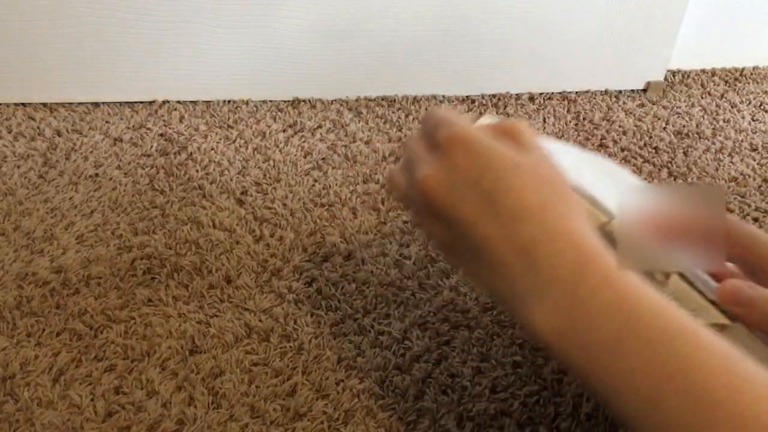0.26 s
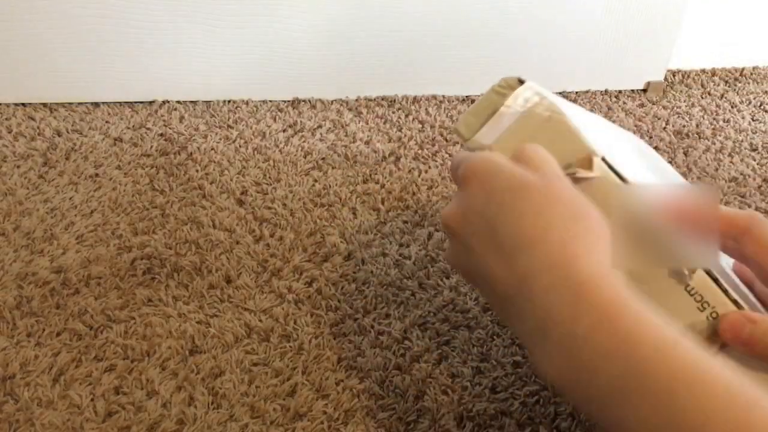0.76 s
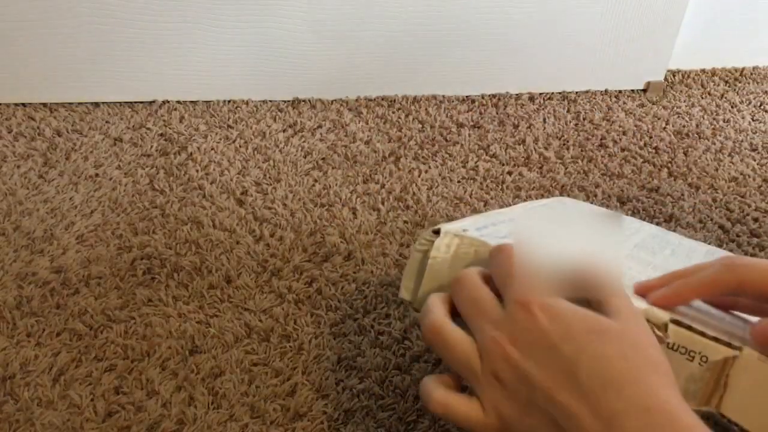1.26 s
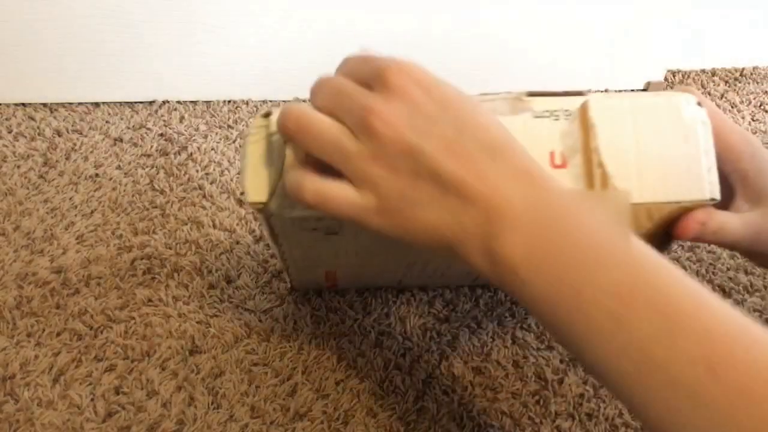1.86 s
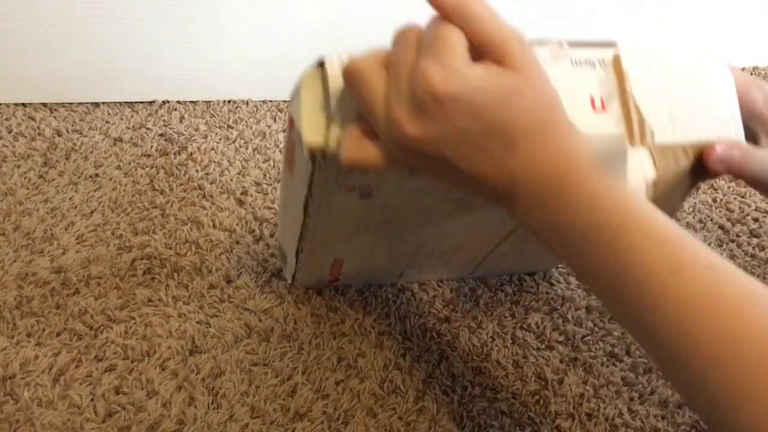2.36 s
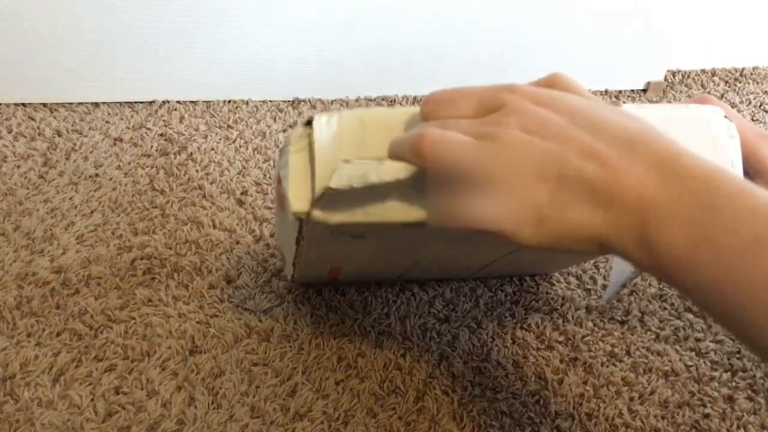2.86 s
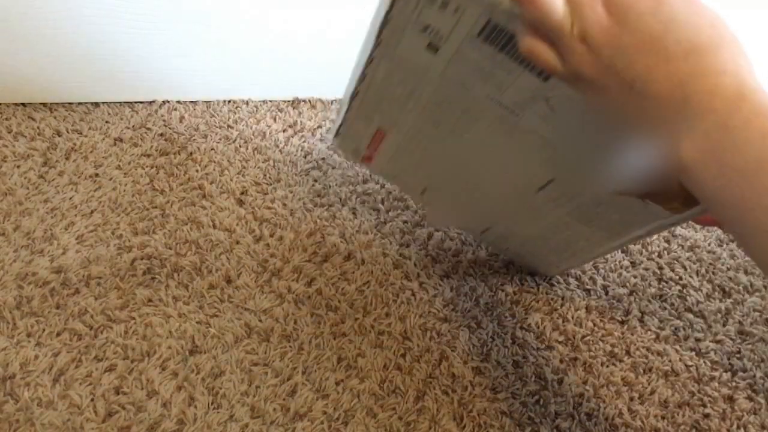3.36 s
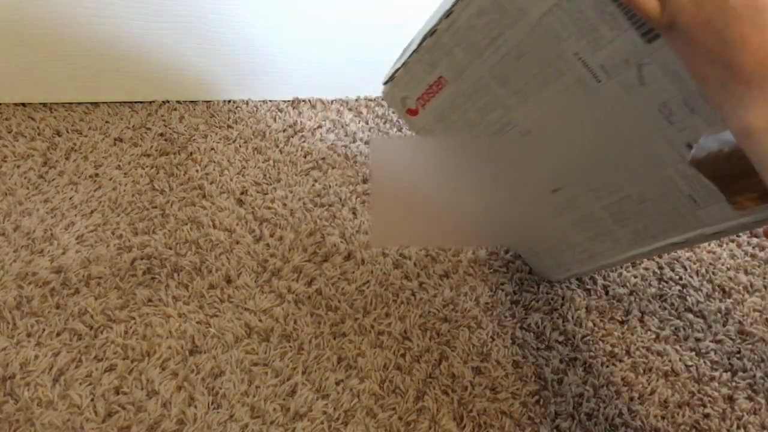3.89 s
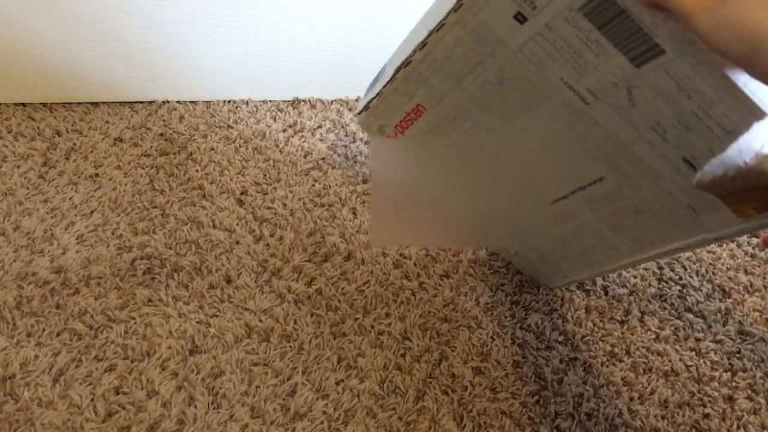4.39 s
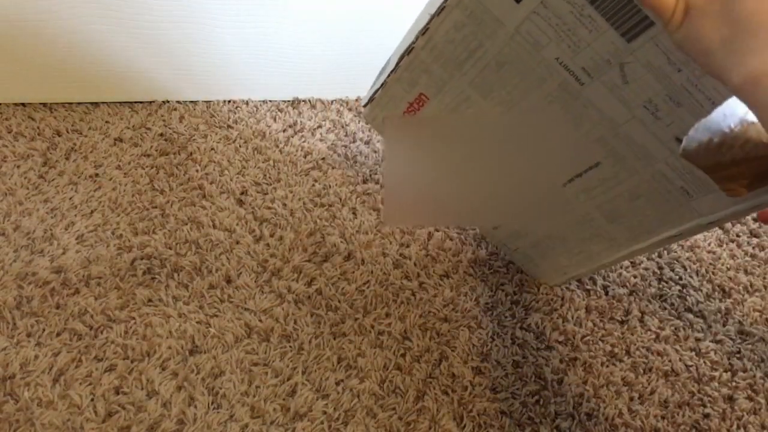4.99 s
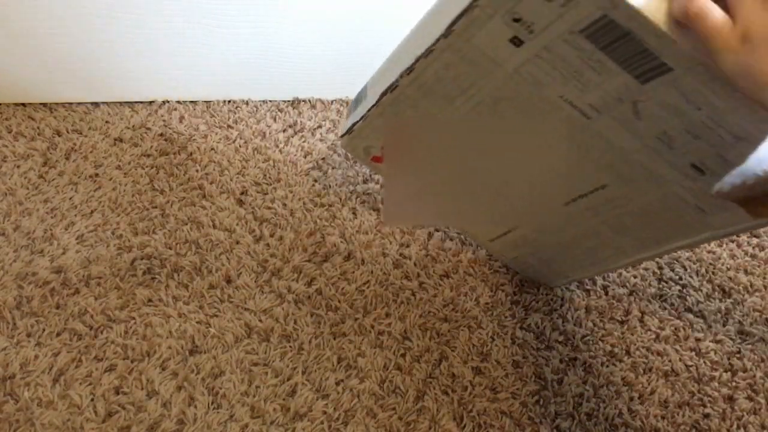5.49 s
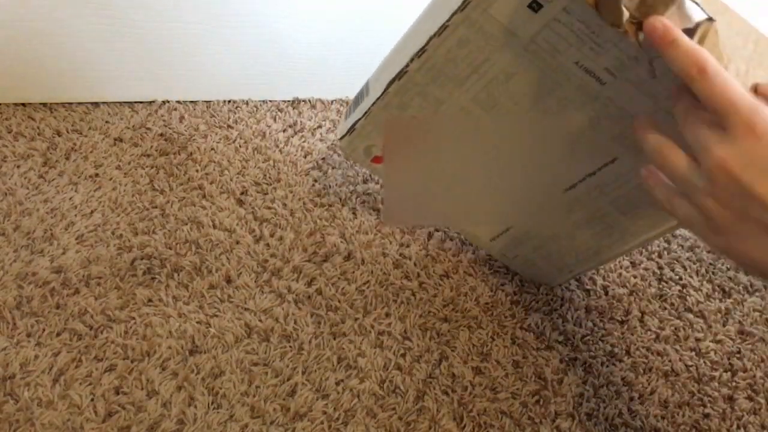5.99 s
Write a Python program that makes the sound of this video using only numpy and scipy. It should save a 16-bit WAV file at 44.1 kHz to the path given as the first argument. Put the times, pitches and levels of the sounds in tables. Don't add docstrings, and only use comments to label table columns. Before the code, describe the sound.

Cardboard rips and buckles in uneven bursts, folds popping sharply and fingers rubbing the board, with one sharp loud crack near the end.

```python
import sys
import numpy as np
from scipy import signal
from scipy.fft import rfft, irfft
from scipy.io import wavfile
from scipy.ndimage import uniform_filter1d

SR = 44100
rng = np.random.default_rng(int(sys.argv[2]) if len(sys.argv) > 2 else 0)


def magnitude_from_level(level_db):
    exponent = np.asarray(level_db, float) / 20
    return 10 ** exponent


def int16_out(signal):
    q = np.round(np.clip(np.atleast_2d(signal).T, -1, 1) * 32767)
    wavfile.write(sys.argv[1], SR, q.astype(np.int16))


N = 275625


def tearing():
    # pitch in Hz, level in dB per Hz.
    fibre_colour = [(2000, -13.5), (3400, 0.5), (4800, -2.5), (6250, -1), (8700, -8.5), (10000, -5),
                    (16000, -11)]
    # pitch in Hz, level in dB per Hz.
    board_colour = [(400, -24), (750, -9.5), (1200, -2.5), (1600, -3), (3500, -15), (6000, -36.5)]
    # pitch in Hz, level in dB per Hz.
    wall_colour = [(70, -29), (250, -7.5), (420, 4), (620, -1), (1300, -56.5)]
    board_gain, fizz_gain, walls_gain = effort()
    breaks = evened(grains(per_s=14000, spread_db=4.0, clump_db=3.0))
    fresh_creases = evened(grains(per_s=6000, spread_db=1.5, clump_db=2.0))
    creases = evened(0.19 * breaks + fresh_creases)
    pushes = grains(per_s=3100, spread_db=2.5, clump_db=4.5)
    fizz = patchy(colour(breaks, fibre_colour), 2.1)
    board = patchy(colour(creases + 0.36 * box(creases), board_colour), 3.94)
    fizz = fizz_gain * patchy(fizz, 1.76, size=512, spans=(2, 8))
    board = board_gain * patchy(board, 1.8, size=512, spans=(2, 8))
    thud = evened(colour(pushes, [(60, -17.5), (120, 5.5), (400, -23.5)]))
    thud = (0.16 * fizz_gain + 0.17 * walls_gain) * thud
    walls = walls_gain * evened(colour(pushes + 0.092 * box(pushes), wall_colour))
    return fizz + board + thud + walls


def effort():
    # time in seconds, pressure in dB.
    resting_grip = [(0.0, -53), (0.17, -63.5), (0.3, -56), (0.7, -64.5), (1.5, -57), (2.05, -60),
                    (2.52, -55.5), (2.75, -64), (3.2, -65), (5.0, -64.5), (5.9, -59.5), (6.25, -59.5)]
    grip_db = [0, -7, -0.5]
    # start in seconds, rise in ms, run in ms, fizz in dB, board in dB.
    runs = [(0.067, 7.1, 78, -53, -46), (0.432, 1.2, 12, -55, -45), (0.492, 4.1, 23, -50.5, -51),
            (0.81, 21, 31, -39, -59), (0.862, 2.1, 41, -39, -68), (0.933, 2.2, 84, -50.5, -47.5),
            (1.053, 14, 11, -46, -34), (1.322, 0.65, 32, -49.5, -43), (1.391, 15, 45, -50.5, -52),
            (1.76, 20, 230, -57, -75), (1.884, 13, 43, -47, -52), (2.217, 47, 8.7, -58.5, -43.5),
            (2.455, 8.3, 26, -37.5, -45), (2.577, 1.1, 15, -59, -32), (2.958, 9.6, 24, -47.5, -48.5),
            (3.444, 1.6, 31, -72, -49), (4.156, 2, 34, -51, -41), (4.27, 2.5, 8.2, -45.5, -45),
            (4.428, 4.5, 93, -46.5, -70), (5.2, 10, 190, -68, -43), (5.316, 40, 73, -47, -49),
            (5.484, 25, 31, -55, -54), (5.604, 9.4, 19, -64, -44.5), (6.157, 5.4, 28, -46, -65)]
    # start in seconds, rise in ms, fall in ms, fizz in dB, board in dB.
    pulls = [(0.182, 140, 46, -48, -49), (0.353, 36, 17, -49.5, -61), (0.517, 19.3, 29, -47.5, -46.5),
             (0.762, 21, 47, -39.5, -41), (1.108, 54, 440, -48, -76), (1.683, 14.5, 47, -49.5, -53),
             (2.061, 18, 81, -46.5, -38.5), (2.39, 29.6, 19, -59, -30), (2.634, 33, 77, -44.5, -41.5),
             (2.79, 60, 33, -54, -38), (3.5, 33, 21, -48, -65), (3.566, 23, 120, -45.5, -60),
             (3.703, 26, 23, -51, -67), (3.854, 47, 95, -47.5, -65), (3.996, 24.5, 69, -32, -34),
             (4.567, 16.5, 47, -43.5, -53), (4.668, 31, 40, -37, -38.5), (4.846, 23, 37, -44, -63),
             (5.825, 14, 170, -49.5, -53), (5.95, 62, 30, -43.5, -48.5), (6.083, 45, 25, -45, -45.5)]
    # start in seconds, fall in ms, fizz in dB, board in dB.
    seams = [(1.531, 160, -43, -44.5), (1.959, 46, -64, -36), (2.387, 145, -28, -31.5),
             (3.089, 170, -47.5, -45.5), (4.532, 41, -44, -56), (4.909, 37, -61, -54),
             (5.096, 140, -46.5, -68), (5.436, 36, -48.5, -44), (5.554, 43, -33, -45),
             (5.693, 39, -28, -33), (6.211, 20, -46, -46)]
    # start in seconds, rise in ms, fall in ms, fizz in dB, board in dB.
    strokes = [(0.177, 24, 100, -53.5, -50.5), (0.74, 52, 1100, -58, -53), (1.03, 120, 60, -58, -46.5),
               (1.299, 22, 78, -95, -46.5), (1.3, 220, 110, -48.5, -54), (2.16, 180, 78, -56.5, -54),
               (2.559, 73, 66, -48.5, -44), (2.729, 110, 66, -51, -45), (2.88, 148, 110, -53, -51),
               (3.2, 182, 70, -54.5, -55), (3.5, 90, 20, -49, -46), (3.55, 99, 720, -57, -52.5),
               (4.13, 196, 300, -51.5, -49.5), (4.637, 57, 240, -49, -49), (4.72, 120, 280, -67, -52),
               (5.1, 220, 55, -58, -48), (5.46, 124, 210, -57.5, -52), (5.66, 87, 57, -58, -46.5),
               (6.06, 134, 32, -58, -54.5)]
    # start in seconds, length in ms, level in dB.
    jolts = [(0.065, 190, -53), (0.181, 51, -43), (0.595, 75, -53), (0.691, 83, -51), (1.12, 155, -42.5),
             (2.385, 29, -33.5), (2.64, 82, -48), (2.79, 180, -42), (2.925, 62, -47.5), (3.55, 105, -48),
             (3.651, 30, -40.5), (3.994, 99, -40.5), (4.66, 136, -48), (5.69, 67, -33.5), (5.896, 45, -45)]
    stroke_sag_db = -13.5

    s, pressure_db = np.transpose(resting_grip)
    pressure_db = np.interp(np.arange(N) / SR, s, pressure_db)
    power = magnitude_from_level(2 * (pressure_db + np.array(grip_db)[:, None]))
    board_power, fizz_power, walls_power = power
    releases = [(start, 1.86, *rest) for start, *rest in seams]
    kinds = ((runs, -10), (pulls, -31.5), (releases, -37), (strokes, stroke_sag_db))
    for rows, sag_db in kinds:
        for start, rise_ms, fall_ms, fizz_db, board_db in rows:
            shape = swell(rise_ms, fall_ms, sag_db)
            add(board_power, start, magnitude_from_level(2 * board_db) * shape)
            add(fizz_power, start, magnitude_from_level(2 * fizz_db) * shape)
    for start, rise_ms, fall_ms, _, board_db in strokes:
        add(walls_power, start, magnitude_from_level(2 * (board_db - 15)) * swell(rise_ms, fall_ms, stroke_sag_db))
    rise_share = 0.32
    for start, ms, db in jolts:
        shape = swell(rise_share * ms, (1 - rise_share) * ms, sag_db=-41)
        add(walls_power, start, magnitude_from_level(2 * db) * shape)
    return np.sqrt(power)


def swell(rise_ms, fall_ms, sag_db, rise_db=13.5):
    corners = np.cumsum([0, rise_ms, fall_ms, 6.0]) * SR / 1000
    level_db = np.interp(np.arange(corners[-1]), corners, [-rise_db, 0, sag_db, sag_db - 2])
    return magnitude_from_level(2 * level_db)


def grains(per_s, spread_db, clump_db):
    happens = rng.random(N) < per_s / SR
    size = np.minimum(rng.exponential(1, N), 2)
    push = rng.standard_normal(N)
    clump = uniform_filter1d(rng.standard_normal(N), size=130)
    clump = evened(uniform_filter1d(clump, size=130))
    return happens * push * magnitude_from_level(spread_db * size + clump_db * np.clip(clump, -2, 1))


def patchy(x, depth_db, size=256, spans=(7, 8)):
    z = signal.stft(x, nperseg=size)[2]
    patches = rng.standard_normal(z.shape[::-1]).T
    patches = uniform_filter1d(patches, size=spans[0], axis=0)
    patches = evened(uniform_filter1d(patches, size=spans[1], axis=1))
    return evened(signal.istft(z * magnitude_from_level(depth_db * patches), nperseg=size)[1][:N])


def snaps():
    t = np.arange(900) / SR
    knocks, cracks = np.zeros((2, N))
    for s, knock_db, hz, crack_db, ms, sharp in folds():
        over, late = rng.random(2)
        noise = rng.standard_normal(len(t))
        cycles = t * hz
        u = t / (0.00029 * ms)
        phase = 2 * np.pi * (0.86 * cycles + 0.43 * (1 - np.exp(-cycles)) + late)
        knock = (u * np.exp(1 - u)) ** 2 * np.sin(phase)
        extra_hz = 0.59 * hz * over + 1100
        edge_cycles = cycles + extra_hz * 0.00217 * (1 - np.exp(-t / 0.0021))
        edge_fade = np.exp(-t / 0.0017) * np.minimum(t / 0.00042, 1)
        edge = np.sin(2 * np.pi * edge_cycles) * edge_fade
        add(knocks, s, magnitude_from_level(knock_db) * (knock + sharp * edge + 0.026 * ring(t, hz, 0.041)))
        crack_fade = np.minimum(u, 1) * magnitude_from_level(-60 * t / (0.0026 + 0.0028 * ms))
        add(cracks, s, magnitude_from_level(crack_db + 2.5) * noise * crack_fade)
    bright = signal.sosfilt(signal.butter(4, 4300, "high", fs=SR, output="sos"), cracks)
    bright = colour(bright, [(5700, -1.5), (7300, -1.0), (9500, -4.0), (16000, -6.5)])
    return knocks + magnitude_from_level(-8.5) * box(knocks) + bright


def folds():
    # time in seconds, knock peak in dB,
    # knock pitch in Hz, crack peak in dB, knock length in ms.
    bursts = [(0.076, -40, 637, -34, 6.3), (0.7699, -28, 1860, -31, 10), (0.7813, -30, 1140, -41, 5.4),
              (1.064, -34, 2450, -48, 4.5), (1.6172, -11, 1780, -34, 2.16), (2.3734, -29, 2100, -22.5, 2.3),
              (2.3889, -18, 2960, -12.5, 4.6), (2.4018, -27, 1950, -13, 16),
              (2.4079, -18, 1710, -14.5, 2.1), (2.5773, -13.5, 1136, -32.5, 2.15),
              (2.8433, -21, 2860, -33, 2.6), (3.5142, -22.5, 1480, -35, 2.4),
              (3.8969, -18.5, 1430, -25, 2.6), (4.0033, -27, 580, -25, 1.14), (4.0186, -18, 1840, -40, 2.2),
              (4.021, -12, 1600, -36, 0.88), (5.0238, -23.5, 3140, -25, 0.61),
              (5.0988, -21.5, 2250, -28, 1.7), (5.5513, -24.5, 710, -23, 0.83),
              (5.561, -51, 3650, -20, 1.6), (5.6967, -5, 1700, -12.5, 1.93),
              (5.7002, -4.5, 1430, -16, 3.36), (5.8587, -21.5, 3240, -35, 0.67),
              (6.1137, -23.5, 4000, -28, 1.5)]
    # time in seconds, peak in dB, pitch in Hz, sharp edge in dB.
    thumps = [(0.2917, -27.5, 1390, -20), (0.431, -35.5, 1240, -4), (1.3213, -29, 800, -6),
              (1.6526, -27.5, 1130, -43), (1.6625, -31, 1160, -26), (1.666, -30.5, 1190, -30),
              (1.6709, -33, 1200, -25), (1.68, -36, 1190, -25), (1.718, -33, 1300, -17),
              (1.754, -40.5, 446, 1), (2.125, -31, 1220, -10), (2.7364, -30.5, 1430, -16),
              (3.0081, -27, 1430, -13), (3.26, -33.5, 690, 1.5), (3.2982, -32, 874, -2),
              (3.3467, -33, 1020, -2), (3.364, -31, 915, 1), (3.385, -33, 825, 3), (3.4047, -34, 724, 0),
              (3.445, -33, 820, 0), (3.452, -38, 620, 4), (3.468, -38.5, 760, -5), (3.5644, -37, 696, 2),
              (4.011, -27, 1010, -2), (4.3164, -31, 1550, -4), (5.437, -35.5, 1220, 0.5),
              (5.4429, -32, 1230, -4), (5.9126, -44, 580, 3), (6.19, -36.5, 587, -4)]
    # time in seconds, peak in dB, pitch in Hz.
    ticks = [(0.8237, -27, 3140), (0.8633, -35, 3640), (1.1956, -21, 1880), (1.2129, -21.5, 1930),
             (1.2353, -24.5, 2000), (1.247, -19, 2040), (1.2585, -20.5, 2160), (2.3456, -29.5, 1900),
             (2.734, -23, 2230), (2.811, -29, 2770), (2.823, -24, 2320), (2.8288, -25, 2700),
             (3.0906, -25, 2780), (3.1044, -27.5, 3380), (3.535, -30, 3700), (4.16, -25, 2620),
             (4.3962, -39, 3040), (4.4026, -25, 2930), (5.3863, -24.5, 2830), (5.5002, -29, 2470),
             (6.052, -36, 1730), (6.212, -32, 2590)]
    # time in seconds, knock peak in dB, knock pitch in Hz, crack peak in dB.
    bits = [(0.186, -41, 1560, -31.5), (0.8, -34, 1800, -31), (0.8918, -40, 3600, -29),
            (0.9313, -35.5, 1340, -32), (1.9587, -26.5, 1350, -28.5), (1.9644, -31.5, 1100, -34),
            (2.5818, -48, 980, -31), (2.667, -28.5, 980, -39), (2.686, -34, 2170, -37),
            (2.847, -47, 1760, -28.5), (2.971, -36, 4050, -23.5), (2.983, -35, 3180, -24.5),
            (3.1206, -46, 2970, -36), (3.7577, -32.5, 1250, -33.5), (3.8758, -35, 2730, -34),
            (3.9974, -27, 2880, -25.5), (4.271, -41, 1540, -30), (4.389, -44, 2340, -27),
            (4.687, -26.5, 2760, -32), (4.695, -49, 2150, -43), (4.741, -45, 1560, -29),
            (4.809, -37, 2800, -35), (4.879, -38, 770, -30), (5.0637, -29.5, 2410, -30.5),
            (5.1146, -32.5, 2500, -29.5), (5.5494, -25.5, 1200, -23)]
    rows = [(s, db, hz, db - 21, 2.4, magnitude_from_level(edge_db)) for s, db, hz, edge_db in thumps]
    others = [tuple(row) for row in bursts]
    others += [(s, db, hz, db - 18, 1000 * 2.15 / hz) for s, db, hz in ticks]
    others += [(*row, 2) for row in bits]
    rows += [(s, db, hz, crack_db, ms, (700 / hz) ** 2) for s, db, hz, crack_db, ms in others]
    return sorted(rows)


def box(x):
    # pitch in Hz, time to fall 60 dB in seconds, level in dB.
    box_modes = [(434, 0.029, 7), (620, 0.0093, 17), (1136, 0.013, 3.5), (1350, 0.0083, 0),
                 (1690, 0.0067, 1)]
    t = np.arange(4000) / SR
    ringing = sum(magnitude_from_level(db) * ring(t, hz, t60) for hz, t60, db in box_modes)
    return signal.oaconvolve(x, ringing / np.linalg.norm(ringing))[:len(x)]


def pings():
    # time in seconds, peak in dB, pitch in Hz, length in # ms.
    ping_rows = [(0.770, -38, 5470, 6.9), (0.779, -40, 5300, 9), (0.78, -28.5, 1680, 10),
                   (0.783, -35, 1013, 16), (0.823, -38, 3260, 8.1), (0.832, -42, 3320, 10),
                   (0.823, -36.5, 1700, 13), (0.890, -39, 3380, 8.6), (1.063, -41, 2150, 11),
                   (1.068, -31, 1430, 7), (1.170, -39, 2000, 4.6), (1.2477, -32.5, 1180, 8.5),
                   (1.6166, -31, 4740, 2.4), (1.6165, -34, 6450, 2.3), (1.6736, -29, 1210, 5.8),
                   (1.687, -42, 1150, 3.6), (1.692, -33, 1270, 4.4), (4.007, -36, 290, 16),
                   (1.713, -40, 1210, 4.5), (2.346, -39, 1200, 2.6), (2.374, -32, 980, 7.6),
                   (2.373, -29, 3580, 4), (2.387, -36, 3800, 5), (2.398, -25, 1510, 11),
                   (2.804, -36, 2650, 3.3), (2.805, -33, 520, 7.2), (2.81, -37, 4130, 4),
                   (2.812, -33, 530, 6.9), (2.822, -35, 4140, 3), (2.823, -39, 690, 7),
                   (2.829, -30, 4100, 3.8), (2.831, -31, 1340, 6.8), (2.835, -32, 2300, 3.6),
                   (2.843, -30, 5230, 3.3), (2.847, -29, 2380, 2.1), (2.847, -25, 500, 4.7),
                   (2.871, -39, 4000, 5), (2.870, -39, 2410, 7.6), (3.128, -38.5, 1200, 4.9),
                   (3.420, -39, 1500, 2.8), (3.459, -35, 910, 4), (3.514, -35, 3850, 3.7),
                   (3.576, -40, 3660, 2), (3.5875, -36.5, 2400, 4.5), (3.5875, -40, 5550, 2),
                   (3.757, -43, 4700, 4), (3.895, -29.5, 3520, 3.3),
                   (3.997, -35, 1490, 4.8), (4.003, -26, 3100, 4.3), (4.01, -27, 3520, 3.4),
                 (4.0221, -19, 1600, 4.8), (4.271, -40, 1180, 7.9), (4.311, -34.5, 1200, 7.4),
                 (4.437, -38, 1660, 3.6), (4.444, -34, 2270, 2.4), (4.455, -39, 4540, 3),
                 (4.678, -40, 2520, 3.3), (4.671, -39, 4080, 8), (4.689, -31, 1650, 2.5),
                 (4.692, -26.5, 4170, 4), (4.694, -28, 1170, 7.9), (4.718, -41, 1800, 3.3),
                 (4.718, -40, 4530, 3), (4.742, -37, 880, 4.5), (4.784, -39.5, 2600, 4),
                 (4.826, -38, 2420, 2.5), (4.843, -39.5, 1230, 10), (4.880, -40, 435, 9.7),
                 (5.161, -42, 3520, 3), (5.368, -39, 2200, 3.4), (5.384, -43, 3350, 4.5),
                 (5.387, -42, 1200, 15), (5.617, -45, 1500, 4.5), (5.6963, -11.5, 4130, 1.46),
                 (5.699, -18, 5560, 4.5), (5.704, -32, 1270, 2.9), (5.697, -38.5, 88, 64),
                 (5.702, -33, 403, 17), (5.6955, -22.5, 580, 13), (5.6967, -14, 1360, 5.7),
                 (4.005, -34, 193, 28), (5.908, -60, 620, 9.7), (5.90, -46.5, 194, 30),
                 (2.392, -40, 139, 34), (5.829, -39, 3800, 3.4), (5.976, -37.5, 1570, 3.9),
                 (6.013, -38, 4000, 4.7), (6.175, -41, 3030, 7.8), (0.2909, -42, 1310, 4.8),
                 (0.4966, -40, 1450, 3.2), (1.5046, -42, 1140, 5.1), (1.8976, -41, 1200, 4.5),
                 (5.549, -32, 400, 22), (5.762, -41, 1260, 15), (2.577, -23, 2260, 3),
                 (2.174, -40, 1400, 2.7), (2.548, -39, 2960, 2.3)]
    out, t = np.zeros(N), np.arange(4000) / SR
    rise_share, sag = 0.25, 0.0063
    for s, db, hz, ms in ping_rows:
        u = t / (0.00078 * rise_share * ms)
        phase = 2 * np.pi * hz * t * (1 - sag * np.tanh(u / 4))
        upper = 0.27 * np.sin(1.52 * phase) * np.exp(-t / 0.0013)
        add(out, s, magnitude_from_level(db) * ((u * np.exp(1 - u)) ** 2 * np.sin(phase) + upper))
    return out


def creak(gain_db=-4):
    # time in seconds, peak in dB.
    flap_slips = [(5.2002, -28), (5.2038, -27), (5.2075, -27), (5.2108, -26), (5.2139, -27), (5.2169, -25),
                  (5.2203, -27), (5.2233, -26), (5.2263, -28), (5.2292, -31), (5.232, -31), (5.2353, -28),
                  (5.2392, -29), (5.2447, -28), (5.2498, -28), (5.2543, -30), (5.2589, -27), (5.2643, -25),
                  (5.2708, -23), (5.278, -22), (5.2879, -21), (5.2948, -23), (5.3001, -23), (5.3042, -24)]
    s, db = np.transpose(flap_slips)
    slips, kicks = np.zeros((2, N))
    at = np.round(s * SR).astype(int)
    slips[at] = magnitude_from_level(db + gain_db)
    kicks[at] = slips[at] * magnitude_from_level(1.9 * rng.standard_normal(len(at)))
    t = np.arange(2500) / SR
    click = 0.23 * ring(t, 1610, 0.04)
    low_ring = 0.1 * ring(t, 424, 0.06) + 0.041 * ring(t, 455, 0.049)
    scrape = colour(slips, [(700, -5.0), (1400, 13.0), (3000, 8.5), (4500, 2.5),
                            (5200, -12), (6600, -10), (10500, -31)])
    ringing = signal.oaconvolve(kicks, click)[:N] + signal.oaconvolve(slips, low_ring)[:N]
    return ringing + 3.8 * disperse(scrape, 1.31)


def disperse(x, lag_ms):
    khz = np.fft.rfftfreq(N, 1000 / SR)
    return irfft(rfft(x) * np.exp(-2j * np.pi * lag_ms * (2 * np.sqrt(khz) - khz / 2)), N)


def sparks(low_hz=7500, t60=0.0097):
    # time in seconds, peak in dB.
    film_ticks = [(0.102, -37), (0.2488, -40), (1.4127, -39), (3.5808, -42), (3.7214, -41), (4.1853, -40),
                  (4.5815, -40), (5.261, -35), (5.318, -41), (5.3224, -39), (5.6441, -45), (5.6802, -36)]
    out, t = np.zeros(N), np.arange(600) / SR
    for s, db in film_ticks:
        add(out, s, magnitude_from_level(db - 60 * t / t60) * rng.standard_normal(len(t)))
    return signal.sosfilt(signal.butter(4, low_hz, "high", fs=SR, output="sos"), out)


def room(x, t60=0.11):
    taps = np.zeros(12000)
    at = np.arange(120, 11980, 20) + rng.integers(0, 20, 593)
    taps[at] = rng.choice([-1., 1.], len(at)) * magnitude_from_level(-60 * at / SR / t60)
    taps = colour(taps, [(1500, -3.0), (16000, -1.5)])
    return signal.oaconvolve(x, taps / np.linalg.norm(taps))[:N]


def room_hum():
    # pitch in Hz, level in dB per Hz.
    hum_colour = [(70, -13.5), (105, -2), (140, -8), (200, -13.5), (1000, -32.5), (16000, -56)]
    return magnitude_from_level(-60.5) * evened(colour(rng.standard_normal(N), hum_colour, size=4096))


def evened(x):
    return x / np.sqrt(np.mean(x ** 2) + 1e-20)


def add(mix, s, sound):
    part = mix[round(s * SR):][:len(sound)]
    part += sound[:len(part)]


def colour(x, points, size=2048):
    f, db = np.transpose(points)
    hz = abs(np.fft.fftfreq(2 * size, 1 / SR))
    gain_db = np.interp(np.log(hz + 1), np.log(f + 1), np.maximum(db, -100))
    log_gain = np.log(magnitude_from_level(gain_db))
    taps = np.fft.ifft(np.exp(np.conj(signal.hilbert(log_gain)))).real[:size]
    return signal.oaconvolve(x, taps)[:len(x)]


def ring(t, hz, t60):
    return np.sin(2 * np.pi * hz * t) * magnitude_from_level(-60 * t / t60)


def scene():
    sharp = snaps() + pings()
    flap = creak()
    reflections = magnitude_from_level(-7.5) * room(sharp + 0.94 * flap)
    mix = sharp + flap + reflections + tearing() + room_hum() + sparks()
    return mix[None]


def low_pass(x):
    return signal.sosfilt(signal.butter(12, 17150, fs=SR, output="sos"), x)


def record(dry):
    edges_hz = [15850, 16700]
    x = signal.sosfilt(signal.butter(4, 72, "high", fs=SR, output="sos"), dry)
    low, top = (signal.firwin(511, hz, window=("kaiser", 9), fs=SR) for hz in edges_hz)
    taps = low + magnitude_from_level(-14) * (top - low)
    finished = signal.oaconvolve(x, taps[None], "same")
    return low_pass(finished)


dry = scene()
out = record(dry)
int16_out(out)
```